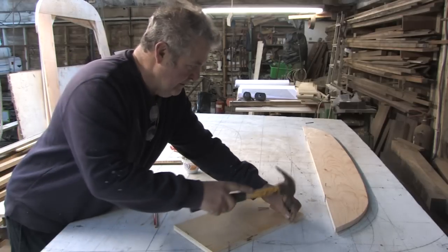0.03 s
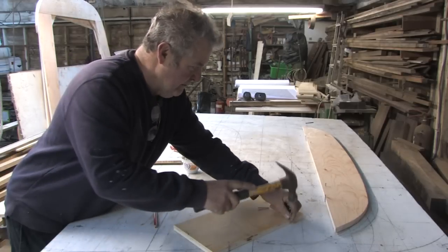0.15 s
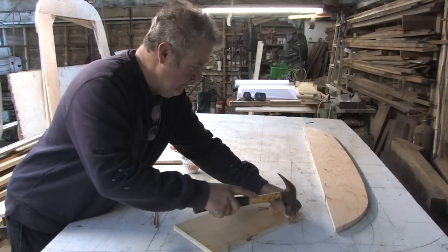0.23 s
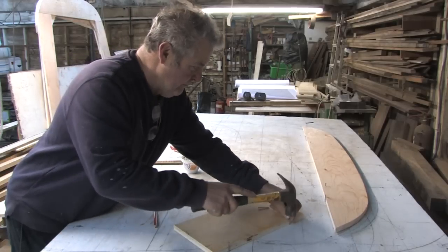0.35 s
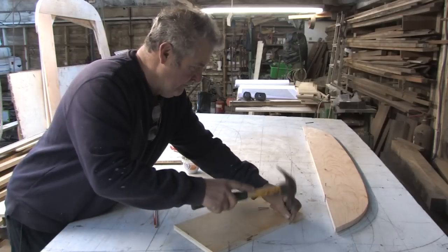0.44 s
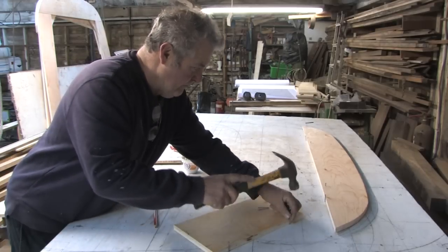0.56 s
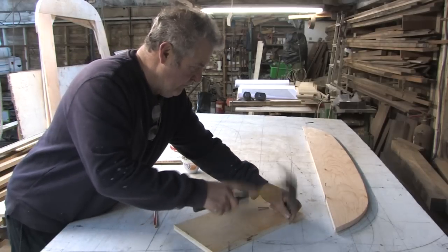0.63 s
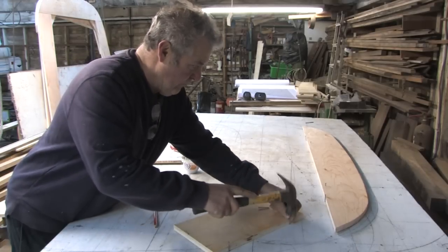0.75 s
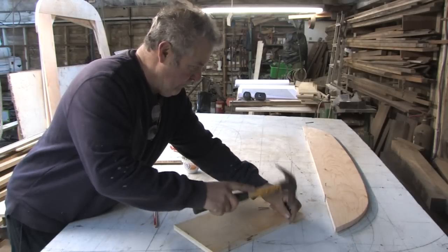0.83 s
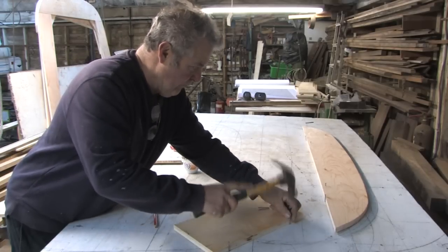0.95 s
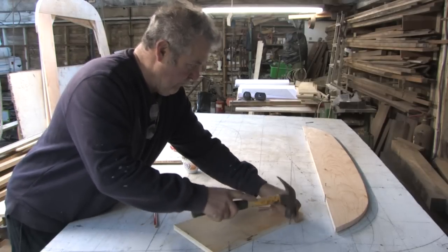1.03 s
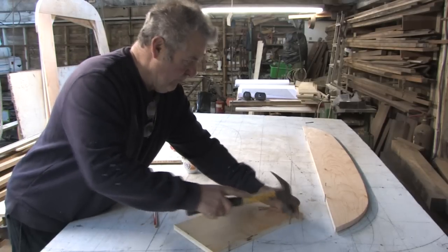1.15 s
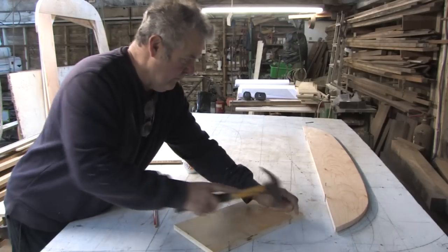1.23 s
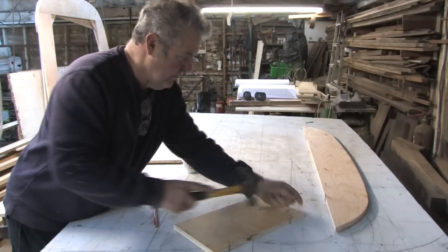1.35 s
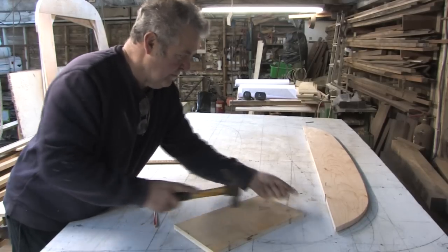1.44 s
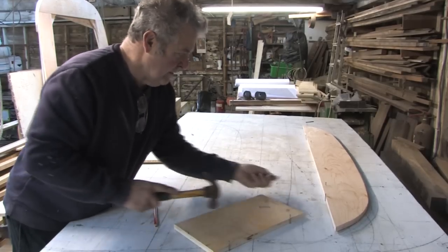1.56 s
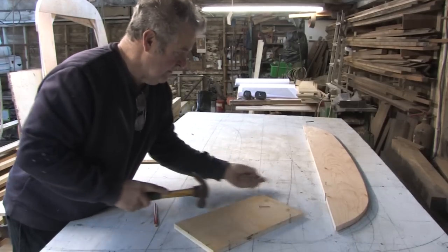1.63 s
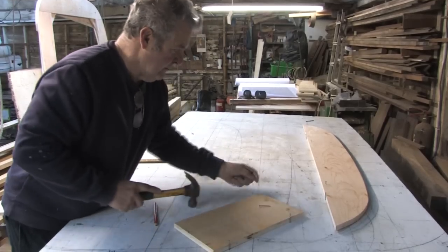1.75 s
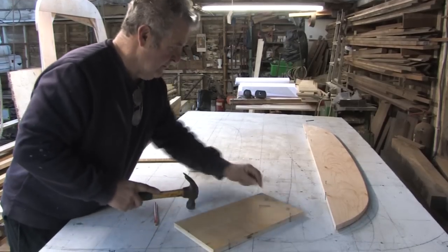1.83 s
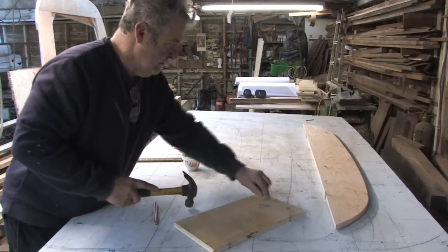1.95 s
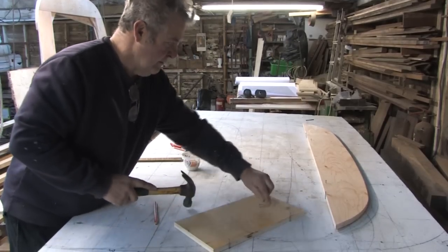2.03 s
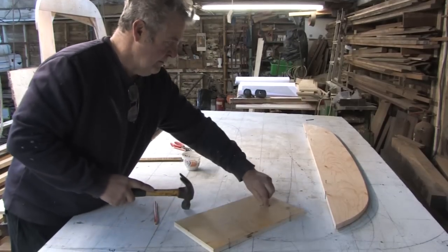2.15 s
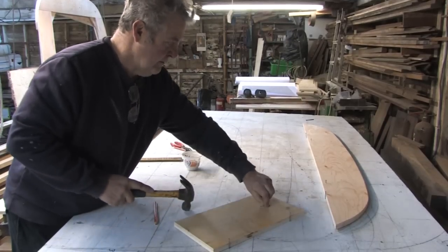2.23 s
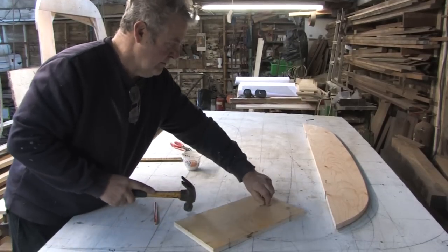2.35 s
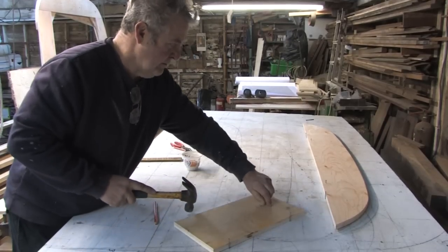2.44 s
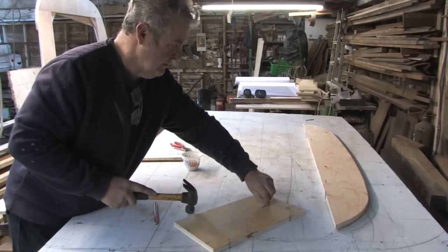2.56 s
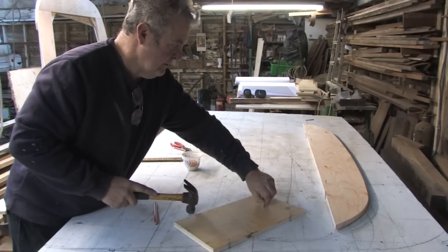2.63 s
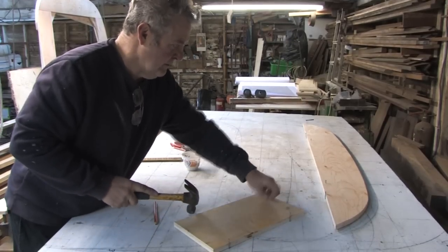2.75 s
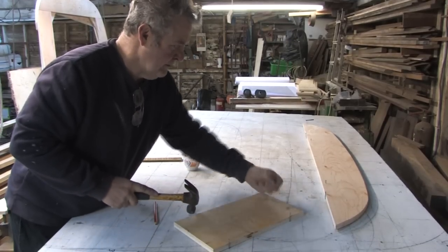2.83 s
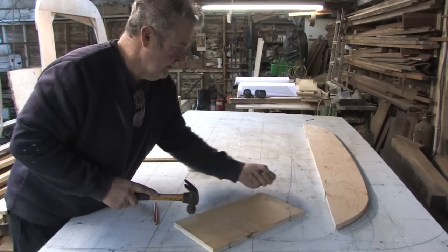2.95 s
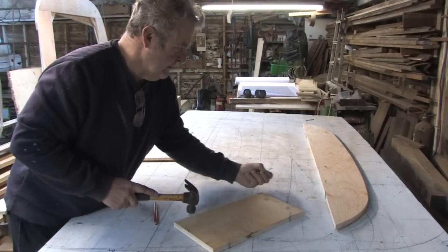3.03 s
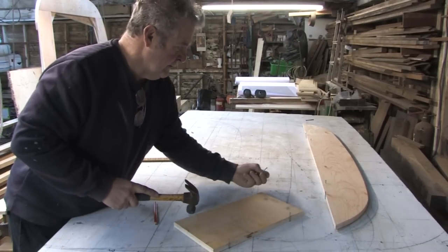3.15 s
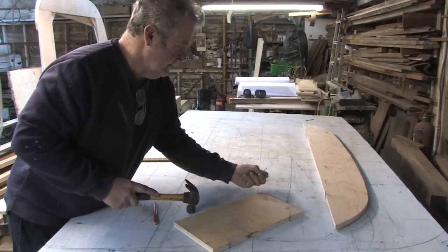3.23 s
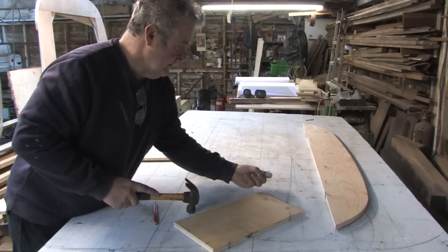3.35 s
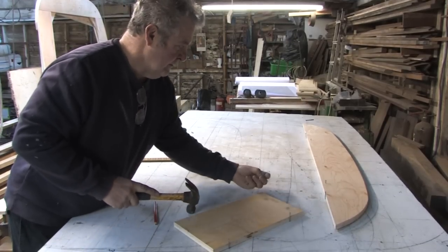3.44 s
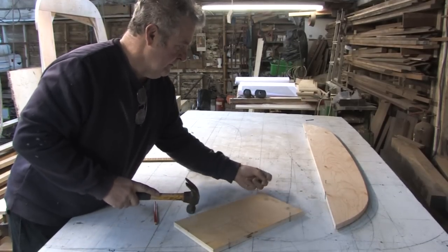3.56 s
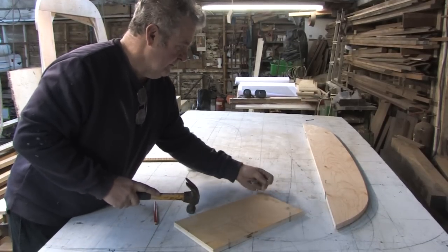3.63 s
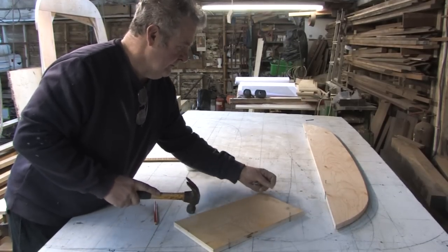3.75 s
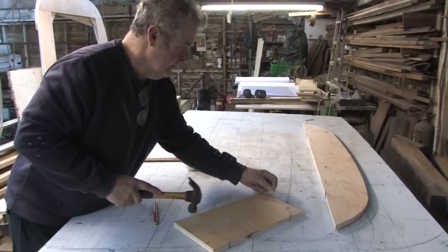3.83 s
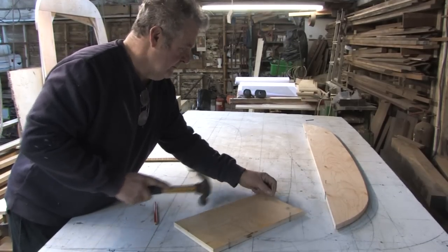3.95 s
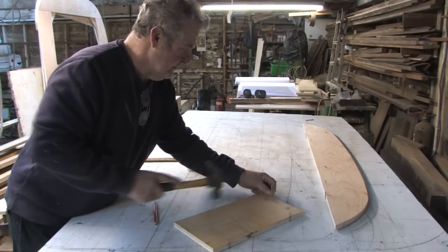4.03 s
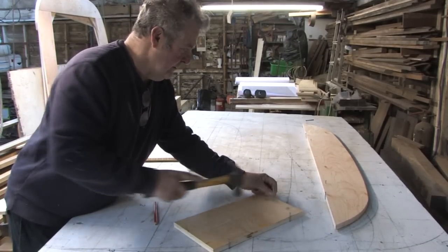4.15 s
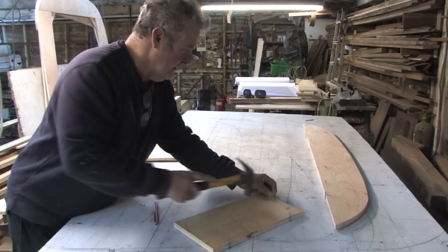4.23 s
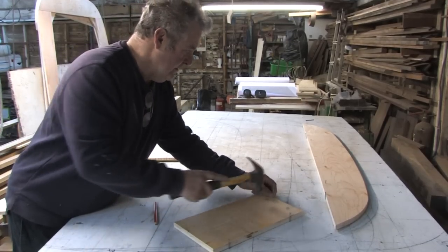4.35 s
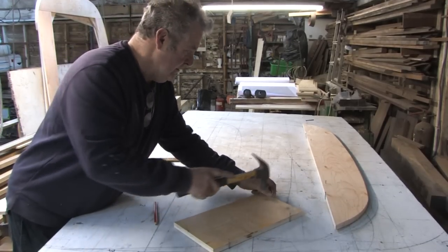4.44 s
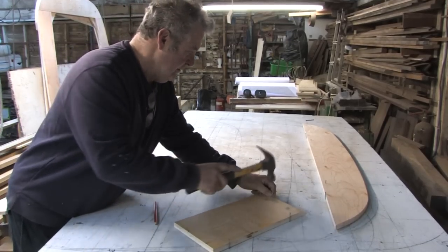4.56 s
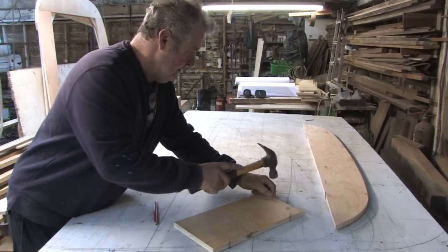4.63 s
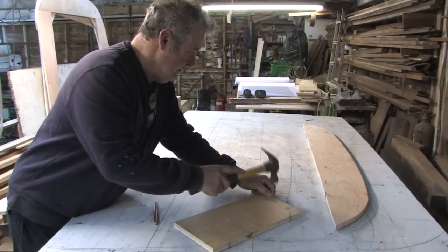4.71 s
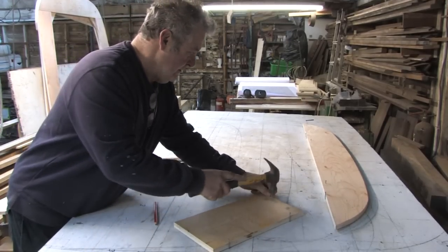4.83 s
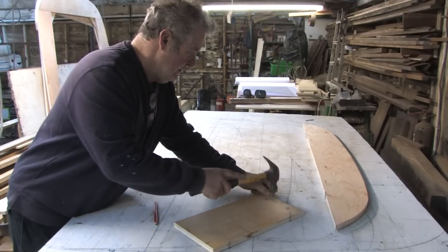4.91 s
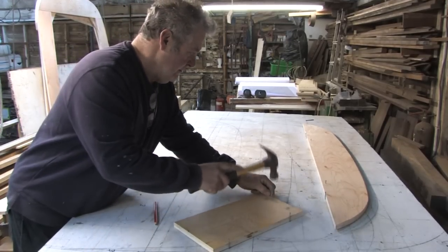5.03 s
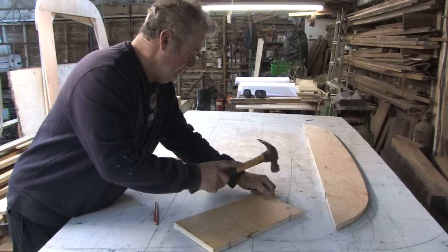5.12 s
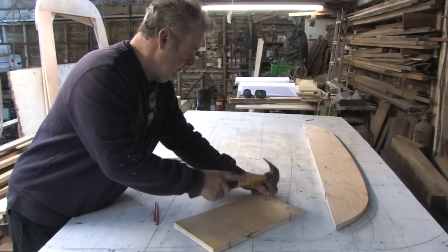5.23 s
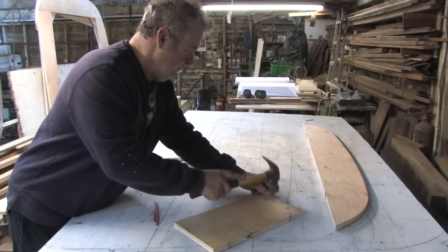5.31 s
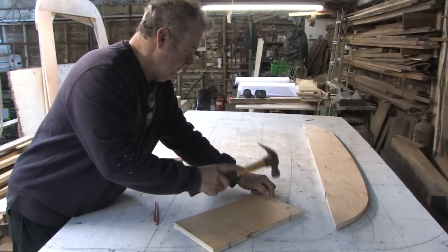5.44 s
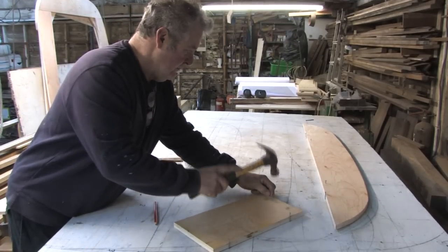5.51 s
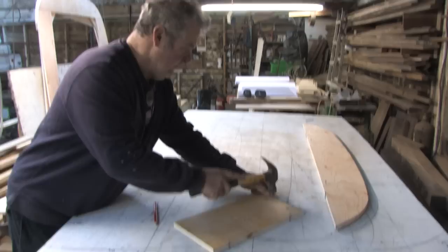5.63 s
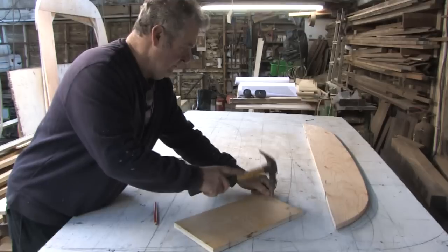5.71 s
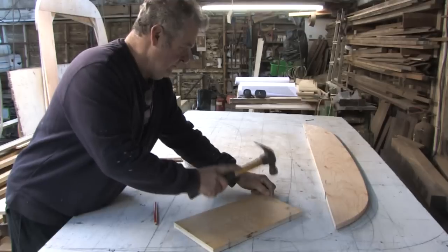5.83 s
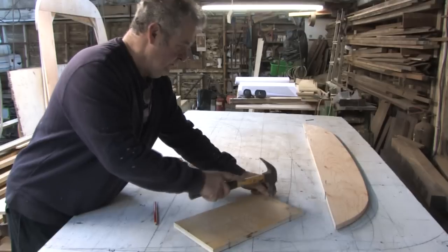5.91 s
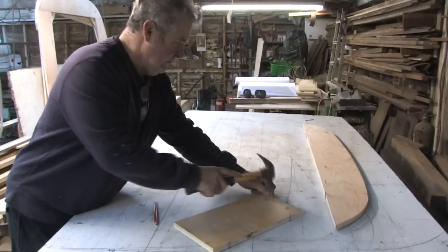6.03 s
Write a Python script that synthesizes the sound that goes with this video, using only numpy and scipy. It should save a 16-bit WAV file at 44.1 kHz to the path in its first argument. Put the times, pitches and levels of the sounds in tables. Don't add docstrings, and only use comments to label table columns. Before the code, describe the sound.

Bright steel cracks and dry board knocks land separately, each with a deep table boom and a shed echo. After the first few, hands slide the board and fiddle with tinkling nails, with light wood and metal taps. Faint scrapes precede a light starting tap, then three heavy blows with buzzing loose nails. Near microphone; levels dip slightly after blows.

```python
import sys
import numpy as np
from scipy import signal
from scipy.fft import rfft, irfft
from scipy.io import wavfile
from scipy.ndimage import uniform_filter1d

SR = 44100
rng = np.random.default_rng(int(sys.argv[2]) if len(sys.argv) > 2 else 0)


def to_wav(s):
    ch = np.atleast_2d(s).T
    pcm = np.round(np.clip(ch, -1, 1) * 32767)
    wavfile.write(sys.argv[1], SR, pcm.astype(np.int16))


def invert_db(x):
    u = np.asarray(x, float) / 20
    return 10 ** u


N = 268128

# pitch_hz, level_db (per Hz)
ROOM_COLOUR = [(12, -61), (33, -13), (45, -6), (91, -4), (160, -1), (219, -9), (333, -10.5), (494, -15),
               (1090, -27.5), (1220, -27), (2080, -40.5), (3970, -42), (14900, -66.5), (16000, -66),
               (16700, -81)]
# pitch_hz, width_hz, level_db
BUILDING_HUM = (40.7, 27.5, -37.5)
# start_s, length_s, peak_db, peak_place (share of the length),
# brightness (-5 dull to 5 bright)
SHUFFLES = [(1.326, .13, -46, .6, 6.5), (1.51, .1, -65, .05, -13), (1.639, 0.21, -55.5, 0.27, 9),
            (1.79, 0.18, -51.5, 0.52, 0.5), (2.198, 0.1, -43.5, .05, 0), (2.347, 0.054, -38.5, .7, -3),
            (2.371, .3, -48, 0.19, 1.2), (2.552, 0.1, -38, 0.51, -1.5), (2.619, 0.16, -51, 0.5, 0),
            (3.66, .14, -45.5, .4, -7), (3.74, 0.097, -41.5, 0.49, -8), (3.801, 0.14, -32.5, .3, -7),
            (3.94, 0.054, -40.5, 1, -3.5)]
# pitch_hz, level_db (per Hz)
RUSTLE_COLOUR = [(410, -89.5), (700, -13.5), (841, -10), (1170, -6), (1420, -1.5), (1820, -3), (2880, -1.5),
                 (3070, -2), (4860, -4.5), (6320, -14), (16000, -32.5)]
# start_s, length_s, peak_db, peak_place (share of the length)
SCRAPES = [
    (4.375, 0.088, -50, .55),
    (4.442, 0.12, -45.5, 0.32),
    (4.495, 0.13, -42.5, 0.65),
    (4.694, 0.038, -58, 0.46),
    (4.798, 0.14, -48, 0.57),
]
# pitch_hz, width_hz, level_db
HAMMER_FACE = [(1690, 550, 0), (3500, 1000, 10), (5000, 640, 5), (7500, 1500, -25), (11500, 2800, -28)]
# start_s, low_ring_db, high_ring_db, t60_s (time to fade by 60 dB)
CLINKS = [(1.6367, -47, -77.5, 0.2), (1.6644, -45.5, -62, 0.12), (1.6931, -45, -55, 0.25),
          (2.8145, -47.5, -74, 0.44), (2.87, -43, -69, 0.18), (2.916, -39, -49, 0.083),
          (2.986, -51, -70, 0.091), (3.0111, -42, -66, 0.096), (3.0294, -52, -71, 0.42),
          (3.142, -45.5, -57, 0.34), (3.5209, -50, -79, 0.17), (3.6, -49, -72, 0.15),
          (3.6294, -46, -67, 0.11), (3.9345, -54, -75, 0.11), (3.9977, -44, -70, 0.13),
          (4.0038, -38, -63, 0.2), (4.0294, -40, -63, 0.15), (4.0794, -51, -44, 0.066),
          (4.1809, -58, -74, 0.14), (4.6932, -54, -54, 0.086)]
# pitch_hz, width_hz
NAIL_MODES = [(6700, 115), (14400, 130)]
# start_s, level_db, centre_hz
HOPS = [(.435, -48, 7000), (.449, -39, 6960), (.7735, -48, 10000), (.7794, -46, 12100), (.803, -52, 12000),
        (.846, -49, 7950), (0.859, -35.5, 6960), (1.13, -34, 8000), (1.204, -53, 8000), (4.912, -50, 10000),
        (4.9183, -34, 7000), (4.936, -32, 7000), (5.349, -23, 9500), (5.359, -28, 9000),
        (5.375, -50, 10000), (5.3923, -33, 9000), (5.4221, -46, 10000), (5.4794, -54, 8000),
        (5.696, -28, 9450), (5.7703, -39, 8000)]
# start_s, level_db, centre_hz, t60_s
TICKS = [(0.2048, -29.5, 1550, 0.045), (0.22, -33, 1500, 0.044), (2.159, -28.5, 1480, 0.073),
         (2.592, -28, 1500, .06), (2.2076, -44, 5000, 0.079), (2.36, -40, 4500, .03),
         (2.3725, -47, 3500, .03), (2.382, -30, 4500, .051), (3.6005, -29, 4600, 0.25),
         (3.996, -27, 700, 0.4), (4.0696, -26, 3260, 0.0082), (4.0784, -39, 3250, .013),
         (4.1774, -41, 3500, 0.098), (4.2304, -44, 3500, 0.054), (4.664, -40, 3660, 0.067),
         (4.8914, -9.5, 5170, 0.0083), (4.8916, -16, 3500, 0.013)]
# start_s, wood_db, steel_db, t60_s
TOUCHES = [(0.2048, -40, -34.5, .04), (.2205, -50, -40, .04), (0.3709, -11.5, -22, 0.016),
           (1.9228, -25, -27, .03), (.6244, -50, -64, .04), (2.1592, -35, -32, 0.076),
           (2.369, -42, -35, 0.11), (2.561, -46, -46, .06), (2.579, -41, -32.5, 0.1),
           (2.601, -36, -37, .06), (2.617, -38, -36, .04), (3.278, -48, -47, .04),
           (3.6013, -12, -16.5, 0.14), (3.6496, -21, -26.5, 0.2), (3.834, -32, -49, .15),
           (3.9938, -30, -35, 0.24), (4.0485, -16.5, -27, 0.18), (4.519, -34.5, -48, 0.44),
           (4.935, -21.5, -41, 0.13), (5.361, -9, -31, 0.027)]
# arrival_s, then level_db of four mode groups, low to high
BOOMS = [
    (0.3166, -13.5, -6, -4.5, -13.5),
    (.372, -18.5, -49, -16, -15.5),
    (0.745, -14.5, -7, -22, -11.5),
    (1.0941, -11, -8.5, -22, -11.5),
    (1.9225, -26.5, -12.5, -11, -11),
    (2.6174, -21.5, -17.5, -18, -24),
    (4.894, -9.5, -14, -14.5, -13.5),
    (5.3209, -5, -0.5, -3, -4.5),
    (5.6651, -9, -3.5, -12.5, -9.5),
    (5.985, -7.5, -4.5, -8, -9),
]
# pitch_hz, level_db, t60_s
TABLE_TOP = [
    [(49.4, -9.5, 1), (93.9, -6, 0.57), (103.7, -0.5, 0.72), (125.4, -1.5, 0.48)],
    [(147.3, -0.5, 0.33), (160.5, 3, 0.31), (184.6, -7.5, 0.85)],
    [(201.4, 8.5, 0.11), (233.5, 0.5, 0.31), (243.7, -12, 0.52)],
    [(304.8, -1.5, 0.34), (315, -1.5, 0.14), (373.3, -5.5, 0.26), (448.4, -2, 0.23)],
]
# pitch_hz, level_db, t60_s
BOARD_MODES = [(552, -17.5, 0.19), (615, -3, 0.15), (651.6, -9.5, 0.25), (790, 1, 0.029), (850, 0.5, 0.034),
               (934, 2, 0.028), (950, 6.5, 0.043), (1077, 5, 0.018), (1250, -31, 0.043), (1284, 3.5, 0.045),
               (1455, -3, 0.022), (1678, -10, 0.055), (1904, -6.5, 0.03), (1980, -17, 0.014),
               (2200, 6.5, 0.01), (2790, -1, 0.0057)]
# pitch_hz, level_db (per Hz)
SHED_COLOUR = [(59, -33), (100, 3), (189, 3.5), (271, -11), (315, 1), (736, -8), (1330, -15), (4670, -40),
               (16000, -83)]
# pitch_hz, t60_s
SHED_FADE = [(100, 1.15), (500, 1.37), (2000, 1.26), (6000, 0.96), (14000, 0.66)]
# pitch_hz, level_db (per Hz)
CRACK_COLOUR = [(880, -0.5), (1500, 0.5), (4780, -10.5), (7440, -15.5), (8740, -21.5), (10400, -23.5),
                (14200, -30), (16700, -41)]
# pitch_hz, level_db (per Hz)
JIGGLE_COLOUR = [(1470, -16), (2500, -3), (5420, -10.5), (5960, -15.5), (6760, -9.5), (9880, -22.5),
                 (15400, -33), (16100, -41), (16500, -45)]
# start_s, crack_db, board_knock_db, shed_echo_db, shaken_nails_db
BLOWS = [
    (0.3105, -11.5, -9.5, -31.5, -35.5),
    (0.3687, -9, -17, -37, -52.5),
    (0.7413, -4.5, -11.5, -17.5, -33),
    (1.0917, -5, -10.5, -16.5, -39),
    (1.9203, -27, -16.5, -36.5, -77),
    (2.614, -50, -34.5, -57, -70),
    (4.8907, -22, -15, -32.5, -40),
    (5.3181, -4.5, -12, -18.5, -23.5),
    (5.6633, -3, -10, -16.5, -30.5),
    (5.9832, -4, -13, -15.5, -35),
]


def evened(x):
    return x / np.sqrt(np.mean(x ** 2) + 1e-20)


def read(points, hz):
    f, value = np.transpose(points)
    return np.interp(np.log(hz + 1), np.log(f + 1), value)


def add(mix, s, sound):
    part = mix[round(s * SR):][:len(sound)]
    part += sound[:len(part)]


def coloured(x, points, tilt_db=0):
    hz = np.fft.rfftfreq(len(x), 1 / SR)
    colour_db = read(points, hz) + tilt_db * np.log2(hz / 3000 + 0.0014)
    return evened(irfft(rfft(x) * invert_db(colour_db), len(x)))


def resonate(x, hz, width, times=1):
    r = np.exp(-np.pi * width / SR)
    for _ in range(times):
        x = 2 * signal.lfilter([1 - r], [1, -r * np.exp(2j * np.pi * hz / SR)], x).real
    return x


def dying(t, t60, rise):
    return (1 - np.exp(-t / rise)) * invert_db(-60 * t / t60)


def grains(count, per_s, spread_db):
    size = invert_db(spread_db * np.minimum(rng.exponential(1, count), 4))
    return size * rng.choice([-1., 1.], count) * (rng.random(count) < per_s / SR)


def stroke(length, db, peak):
    end_db = -14.5
    u = np.arange(SR) / SR / length
    edges = np.clip(np.minimum(u, 1 - u) * length / 0.004, 0, 1)
    return edges * invert_db(db + np.interp(u, [0, np.clip(peak, 0.02, 0.98), 1], [end_db, 0, end_db]))


def tap(s, db, hz, width, t60):
    t = np.arange(SR // 4) / SR
    shape = dying(t, 0.0074, 0.000067) + 0.29 * dying(t, t60, 0.00063)
    sound = shape * rng.standard_normal(len(t)) + 3.6 * (t == 0)
    sound = resonate(sound, hz, 1.19 * width, times=4)
    return s, invert_db(db) * evened(sound) * np.sqrt(np.mean(shape ** 2))


def struck(modes, t, rise, chatter, chatter_t60, spread):
    detune = rng.uniform(-0.8, 1, len(modes))
    ring = 0
    for (hz, db, t60), d in zip(modes, detune):
        ring = ring + invert_db(db - 60 * t / t60) * np.sin(2 * np.pi * hz * (1 + spread * d) * t)
    drive = chatter * dying(t, chatter_t60, 0.0034) * rng.standard_normal(len(t)) + (t == 0)
    sound = signal.fftconvolve(drive, ring)[:len(t)] * (1 - np.exp(-t / rise))
    top_hz = 5.0 * modes[-1][0]
    return resonate(sound, 0, top_hz, times=2) / 4


def rumble():
    frames, hz = N // 512 + 5, np.fft.rfftfreq(2048, 1 / SR)
    a, b, patches = rng.standard_normal((frames, len(hz), 3)).T
    patches = uniform_filter1d(patches, size=10, axis=0)
    patches = evened(uniform_filter1d(patches, size=8, axis=1))
    z = (a + 1j * b) * invert_db(read(ROOM_COLOUR, hz)[:, None] + 2.2 * patches)
    room = signal.istft(z, nperseg=2048, noverlap=1536)[1][:N]
    hum_hz, width, hum_db = BUILDING_HUM
    hum = resonate(rng.standard_normal(N), hum_hz, width, times=2)
    return invert_db(-33.5) * evened(room) + invert_db(hum_db) * evened(hum)


def shuffle(s, length, db, peak, bright):
    rub = grains(SR, 8000, 4.5)
    share = np.clip(0.5 + bright / 10, 0, 1)
    blend = share * coloured(rub, RUSTLE_COLOUR, 2.8) + (1 - share) * coloured(rub, RUSTLE_COLOUR, -11.5)
    return s, stroke(length, db, peak) * blend


def scrape(s, length, db, peak):
    clumps = invert_db(5.3 * evened(uniform_filter1d(rng.standard_normal(SR), size=500)))
    slips = grains(SR, 6000, 2.3) * clumps
    ring = sum(invert_db(top_db) * resonate(slips, hz, w, times=2) for hz, w, top_db in HAMMER_FACE)
    used = int(length * SR)
    return s, stroke(length, db, peak)[:used] * evened(ring[:used])


def clink(s, low_db, high_db, t60):
    t = np.arange(SR // 4) / SR
    rub = (t == 0) + 0.065 * dying(t, t60, 0.002) * rng.standard_normal(len(t))
    low, high = (resonate(rub, hz * rng.uniform(0.98, 1.015), w) * SR / (2 * np.pi * w)
                 for hz, w in NAIL_MODES)
    contact = 0.5 * rng.standard_normal(len(t)) * dying(t, 0.011, 0.0002)
    low = low + 2.0 * resonate(contact, 7000, 3000, times=2)
    return s, invert_db(low_db - 2.0) * low + invert_db(high_db - 1) * high


def hop(s, db, hz):
    return tap(s, db, hz, 5000, 0.069)


def tick(s, db, hz, t60):
    return tap(s, db, hz, 0.36 * hz, t60)


def touch(s, wood_db, steel_db, t60):
    wood = tap(s, wood_db, 1296, 2260, t60)[1]
    steel = tap(s, steel_db, 3020, 2470, 0.82 * t60)[1]
    return s, wood + steel


def boom(s, *group_db):
    t = np.arange(SR) / SR
    modes = [(hz, db + level, t60) for group, level in zip(TABLE_TOP, group_db) for hz, db, t60 in group]
    ring = struck(modes, t, rise=0.002, chatter=0.0084, chatter_t60=0.35, spread=0.03)
    return s, -invert_db(3.5) * ring * (0.4 + 0.33 * np.exp(-t / 0.044))


def shed_echo(tilt_db):
    hz, t, z = signal.stft(rng.standard_normal(SR), SR)
    colour_db = read(SHED_COLOUR, hz) + tilt_db * np.log2(hz / 500 + 1)
    decay = invert_db(colour_db[:, None] - 60 * t / read(SHED_FADE, hz)[:, None])
    swell = np.clip(np.log2(hz / 400 + 1) * 0.5, 0, 1.4)[:, None]
    near = 2.13 * np.exp(-t / 0.023)
    far = 1.75 + 0.61 * swell * np.exp(-((t - 0.15) / 0.072) ** 2)
    tail = signal.istft(z * decay * (near + far), SR)[1][:SR]
    return evened(tail) * 0.45 * (1 - np.exp(-np.arange(SR) / SR / 0.0083))


def burst(shape, tilt_db):
    noise = coloured(shape * rng.standard_normal(len(shape)), CRACK_COLOUR, tilt_db)
    return np.sqrt(np.mean(shape ** 2)) * noise * (np.arange(len(shape)) < len(shape) // 2)


def blow(s, crack_db, knock_db, echo_db, nails_db):
    t = np.arange(SR) / SR
    over_db = nails_db + 41
    bright_db = 2.5 + 0.56 * min(over_db, 0) - 0.13 * max(over_db, 0)
    lead = 0.002916
    late = np.maximum(t - lead, 0)
    snap = dying(late, 0.0058, 0.0001) + 0.12 * dying(late, 0.04, 0.0005)
    snap += 0.32 * np.exp(-abs(t - lead) / 0.001)
    snap += 0.24 * dying(np.maximum(late - 0.006, 0), 0.024, 0.002)
    crack = burst(snap, bright_db) + burst(0.48 * dying(late, 0.076, 0.0032), bright_db - 1)
    sound = invert_db(crack_db + 2.5) * crack + invert_db(echo_db) * shed_echo(0.27 * (echo_db + 32.5))
    knock = struck(BOARD_MODES, t, rise=0.001, chatter=0.031, chatter_t60=0.17, spread=0.056)
    add(sound, lead + 0.00067, invert_db(knock_db - 5) * knock[:SR // 2])
    fizz = dying(t[:SR // 20], 0.041, 0.00013)
    landings = signal.oaconvolve(abs(grains(SR, 610, 3.6)), fizz)[:SR]
    nails = coloured(landings * rng.standard_normal(SR), JIGGLE_COLOUR) * dying(t, 0.37, 0.042) * 1.4
    return s - 0.0016, sound + invert_db(nails_db + 3) * nails


def scene():
    mix = rumble()
    for source, table in ((shuffle, SHUFFLES), (scrape, SCRAPES), (clink, CLINKS), (hop, HOPS),
                          (tick, TICKS), (touch, TOUCHES), (boom, BOOMS), (blow, BLOWS)):
        for row in table:
            add(mix, *source(*row))
    return mix[None]


def roll_off(x):
    return signal.sosfilt(signal.butter(12, 16810, fs=SR, output="sos"), x)


def record(dry):
    dry = signal.sosfilt(signal.butter(4, 32.2, "high", fs=SR, output="sos"), dry)
    power_db = 10 * np.log10(abs(uniform_filter1d(dry[0] ** 2, size=600)) + 1e-12)
    fall = np.arange(N) * 11.5 / SR
    held_db = np.maximum.accumulate(power_db + fall) - fall
    over_db = np.maximum(held_db + 19.5, 0)
    ducked = dry / invert_db(0.14 * uniform_filter1d(over_db, size=300))
    capped = ducked / (1 + abs(ducked) ** 6) ** (1 / 6)
    edge = signal.firwin(255, 16550, window=("kaiser", 9), fs=SR)
    return roll_off(signal.oaconvolve(capped, edge[None], "same"))


dry = scene()
out = record(dry)
to_wav(out)
```